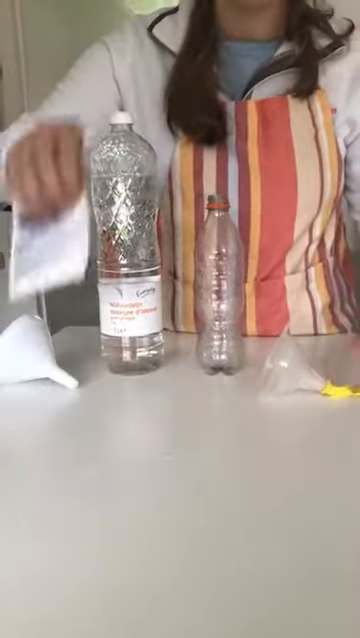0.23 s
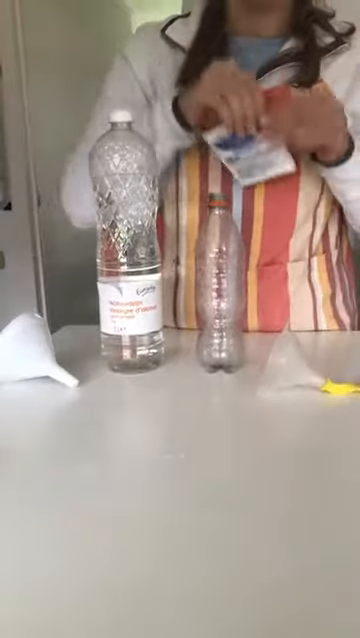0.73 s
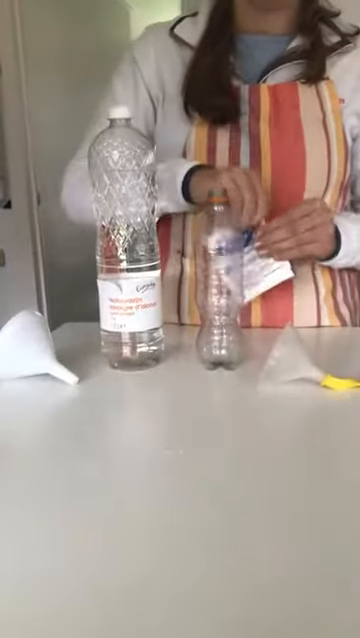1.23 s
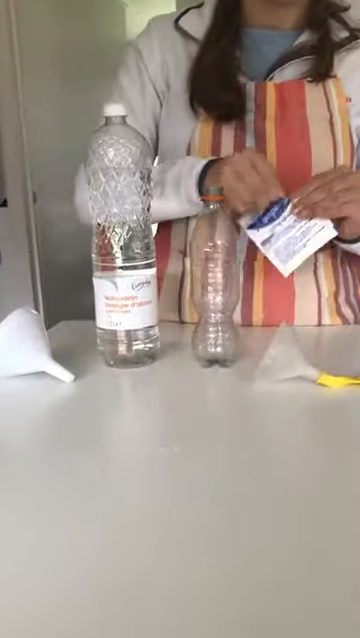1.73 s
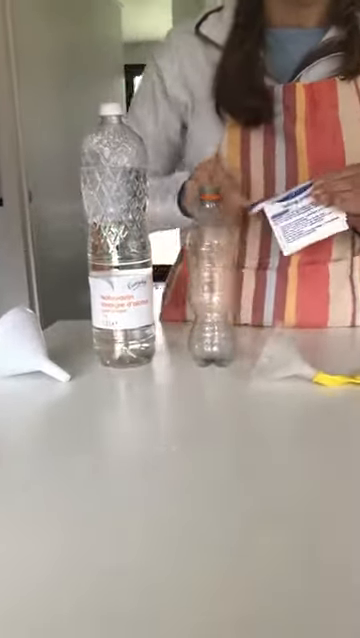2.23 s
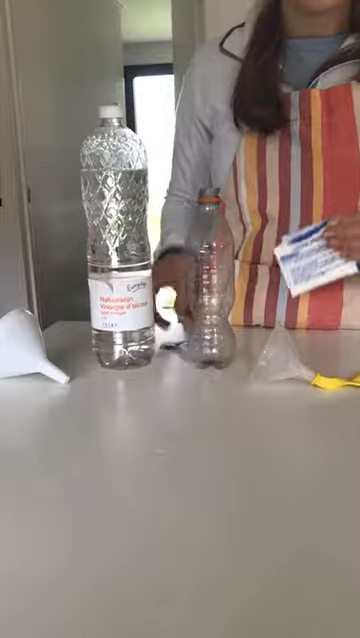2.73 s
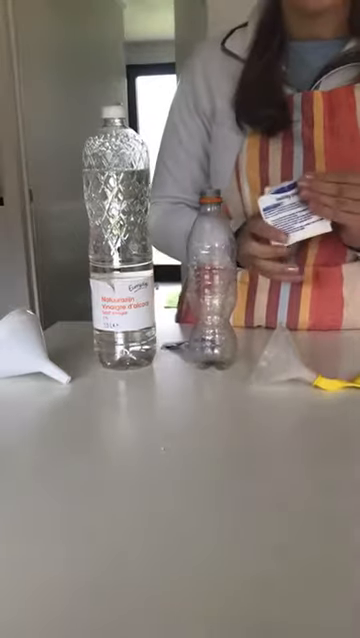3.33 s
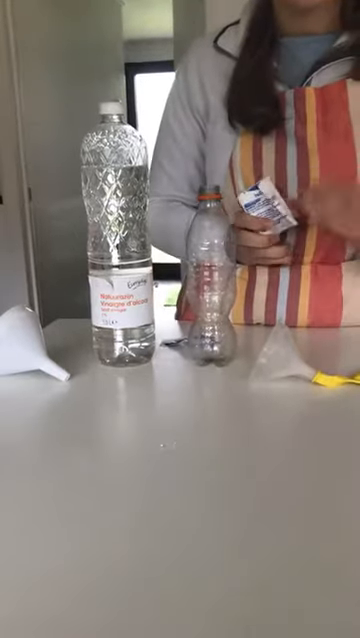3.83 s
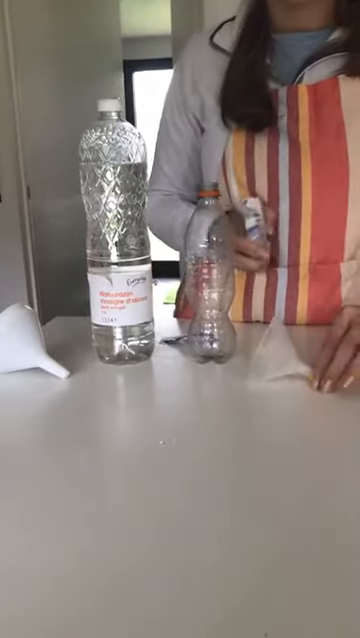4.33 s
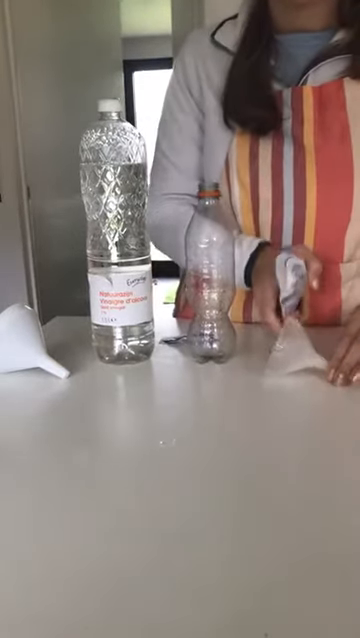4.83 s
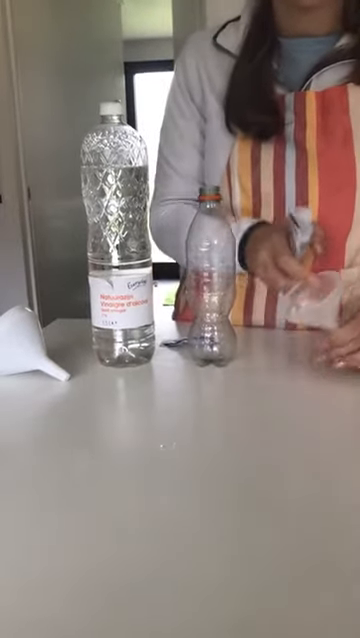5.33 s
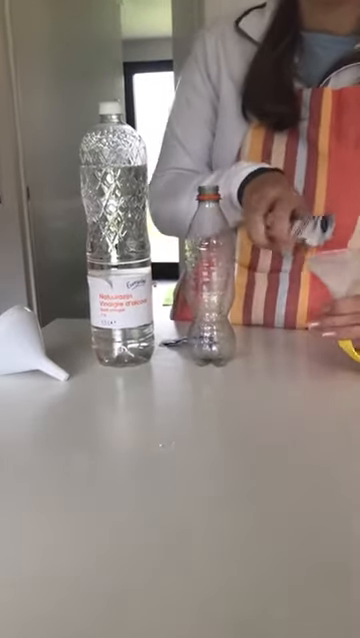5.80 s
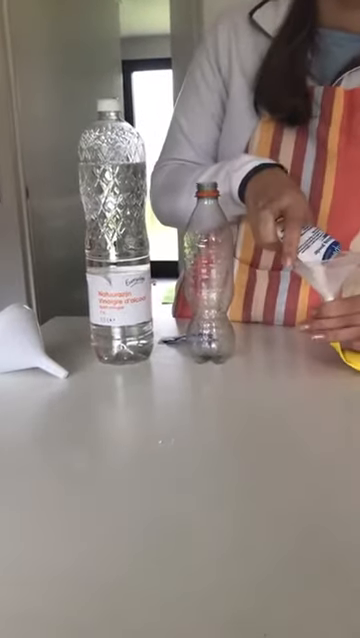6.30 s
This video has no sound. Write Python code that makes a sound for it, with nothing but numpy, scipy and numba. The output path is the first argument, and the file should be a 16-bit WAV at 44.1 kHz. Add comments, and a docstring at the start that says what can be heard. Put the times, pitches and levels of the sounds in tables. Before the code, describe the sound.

Hands handle a small paper sachet with sharp crinkles and snaps, then tear it open in three short, crisp pulls. Lighter rustling and scattered crackles follow as the packet is moved about. From about halfway, a soft, hollow low drone swells and fades unevenly. The sound is fairly close, in a hard-walled kitchen with a slight echo and a faint steady hum.

```python
"""A hard-walled kitchen: above a table, hands crinkle a paper sachet and tear it open in three pulls.
Creases buckle with sharp snaps, fibres break in dense bursts and fingers rustle, all ringing the paper's
resonances and bouncing off the walls. From about halfway a hollow body drones, nudged at random.
Mains hum and room noise lie underneath."""
import sys
import numpy as np
from scipy import signal
from scipy.fft import rfft, irfft
from scipy.io import wavfile
from scipy.ndimage import uniform_filter1d
from numba import njit

SR = 44100
rng = np.random.default_rng(int(sys.argv[2]) if len(sys.argv) > 2 else 0)


def digitize_waveform(pressure):
    """Quantize a signal to 16-bit integers and store it at the path in sys.argv[1].

    Rows of a 2-D input are taken as channels; values are limited to [-1, 1].
    """
    field = np.atleast_2d(pressure).T
    bounded = np.clip(field, -1, 1)
    quanta = np.round(bounded * 32767).astype(np.int16)
    wavfile.write(sys.argv[1], SR, quanta)


N = 289296

# The paper's resonances (boomy panel, crackly crease, crisp edge): pitch_hz, width_hz, gain_db
PANEL_MODES = [(375, 280, 0.5), (500, 67, -7.5), (614, 403, 8.5), (1123, 348, 9)]
CREASE_MODES = [(1960, 1050, -8.5), (2750, 590, 1), (4070, 4100, -5.5), (6000, 980, -3)]
EDGE_MODES = [(8550, 4200, 5.8), (12720, 1900, 5.4), (14300, 1550, 4.4)]


def undb(db):
    """Decibels to amplitude."""
    return 10 ** (np.asarray(db) / 20)


def unit(x):
    """Scale to an rms of 1."""
    return x / np.sqrt(np.mean(x ** 2))


@njit
def bandpass(x, hz, width):
    """State-variable band-pass, gain 1 at the centre."""
    y, band, low = np.empty(len(x)), 0., 0.
    g, damping = np.tan(np.pi * hz / SR), width / hz
    for i in range(len(x)):
        v = (band + g * (x[i] + 1e-18 - low)) / (1 + g * (g + damping))
        band, low, y[i] = 2 * v - band, low + 2 * g * v, damping * v
    return y


def ring(x, modes):
    """A body with a few broad resonances of alternating polarity."""
    return sum((-1) ** k * undb(db) * bandpass(x, float(hz), float(width))
               for k, (hz, width, db) in enumerate(modes))


def fader_curves(spans):
    """One dB curve per column of timed breakpoints; silent outside the spans."""
    t, out = np.arange(N) / SR, np.full((len(spans[0][0]) - 1, N), -150.)
    for span in spans:
        times, *columns = np.transpose(span)
        inside = (t >= times[0]) & (t <= times[-1])
        out[:, inside] = [np.interp(t[inside], times, column) for column in columns]
    return out


def grains(per_s, spread_db):
    """Random clicks; a few are much larger than the rest."""
    hit = rng.random(N) < per_s / SR
    return hit * rng.standard_normal(N) * undb(np.minimum(spread_db * rng.exponential(size=N), 12))


def room_tone(noise_db=-69):
    """Mains hum and the steady noise of room and microphone."""
    # Colour of the noise: frequency_hz, relative_db
    noise_colour = [(15, -57), (25, -16), (60, -2), (97, -4), (321, -3.5), (510, -16.5), (1150, -16),
                    (1550, -18.5), (3510, -23), (7710, -30), (8600, -30.5), (15200, -29), (16500, -66)]
    # Hum partials: pitch_hz, rms_db
    hum_partials = [(49.3, -72.5), (98.6, -79)]
    t, hz = np.arange(N) / SR, np.fft.rfftfreq(N, 1 / SR)
    corner_hz, corner_db = np.transpose(noise_colour)
    colour_db = np.interp(np.log(hz + 1), np.log(corner_hz), corner_db)
    air = unit(irfft(rfft(rng.standard_normal(N)) * undb(colour_db), N))
    hum = sum(np.sqrt(2) * undb(db) * np.sin(2 * np.pi * pitch * t) for pitch, db in hum_partials)
    return undb(noise_db) * air + hum


def kitchen_reverb(x):
    """First reflections from table and walls, and a diffuse tail whose bands die at their own rates."""
    # Bands of the tail: centre_hz, width_hz, t60_s, relative_db
    tail_bands = [(378, 570, 0.51, 1.5), (700, 1500, 0.12, 0.5), (1290, 310, 0.44, 3),
                  (2330, 1400, 0.55, -0.5), (3360, 640, 0.28, 4), (4090, 940, 0.72, -7.5),
                  (6270, 1460, 0.45, 4.5), (9000, 1700, 0.15, 7.5), (12500, 3100, 0.48, -6.5),
                  (15200, 3800, 0.21, 3)]
    # First reflections: delay_s, gain_db
    reflections = [(.0046, -6), (0.0121, -12), (0.026, -35)]
    t = np.arange(int(.7 * SR)) / SR
    rise = np.clip((t - .003) / 0.00069, 0, 1)
    tail = sum(undb(db - 60 * t / t60) * bandpass(rng.standard_normal(len(t)), float(hz), float(width))
               for hz, width, t60, db in tail_bands)
    response = rise * tail / np.sqrt(np.sum(tail ** 2))
    for delay_s, db in reflections:
        response[int(delay_s * SR)] += undb(db)
    return signal.fftconvolve(x, response)[:N]


def drone_swells(attack_s=0.01, hold_s=0.016, t60_s=0.26):
    """An rms envelope: each swell rises fast, holds briefly and dies away."""
    # Swells of the drone: crest_s, peak_db
    swells = [(3.086, -41), (3.321, -68), (3.399, -48.5), (3.438, -44), (3.471, -45), (3.509, -49),
              (3.818, -48.5), (3.909, -52), (3.991, -59), (4.08, -49), (4.11, -50.5), (4.215, -45),
              (4.289, -41.5), (4.329, -55), (4.376, -49.5), (4.593, -50.5), (4.702, -52), (4.774, -49.5),
              (4.833, -52.5), (4.966, -52.5), (5.003, -55), (5.119, -58), (5.184, -50), (5.221, -42),
              (5.274, -51), (5.337, -52), (5.451, -49.5), (5.543, -51), (5.58, -43.5), (5.619, -47),
              (5.693, -46), (5.796, -44.5), (5.845, -47.5), (6.076, -55), (6.152, -59)]
    t, power = np.arange(SR // 2) / SR, np.zeros(N + SR)
    attack = np.clip(t / attack_s, 0, 1)
    decay_db = 60 * np.maximum(t - attack_s - hold_s, 0) / t60_s
    for crest_s, peak_db in swells:
        i = int((crest_s - attack_s) * SR)
        power[i:i + len(t)] += (attack * undb(peak_db - decay_db)) ** 2 / 2
    return np.sqrt(power[:N])


def hollow_drone(evenness=.9):
    """Irregular nudges keep a hollow body sounding, with a faint buzz above its low note."""
    # The body's low resonances and its faint upper ring: pitch_hz, width_hz, gain_db
    hollow_modes = [(212.8, 21.4, 2.5), (177.6, 21, -11.5), (270, 180, -5.5)]
    buzz_modes = [(283, 133, -20.5), (694, 500, -42.5)]
    # The drone between swells: time_s, level_db
    drone_bed = [
        [(3.0, -67), (3.1, -59), (3.55, -58.5), (3.65, -64.5), (3.85, -60), (4.4, -58.5), (5.1, -60),
         (5.8, -57.5), (5.92, -63.5), (6.18, -66), (6.3, -81)],
    ]
    nudges = grains(per_s=600, spread_db=0.81)
    hollow = ring(nudges, hollow_modes)
    level = np.hypot(undb(fader_curves(drone_bed)[0]), drone_swells())
    buzz = uniform_filter1d(level, 16000) * ring(nudges, buzz_modes) / np.std(hollow)
    # steady pushing partly evens out the swings
    swing = np.sqrt(uniform_filter1d(hollow ** 2, 1500))
    evened = hollow / (swing + 0.18 * np.std(hollow)) ** evenness
    # two more passes steepen the flanks of the resonance
    note = unit(bandpass(evened, hz=207., width=40.))
    return bandpass(level * note, hz=218., width=63.) + buzz


def brushes(edge_s=0.006):
    """Grainy friction that starts and stops with the movement."""
    # Short brushes, scrapes and dull bumps: start_s, length_s, centre_hz, nominal_width_hz, level_db
    strokes = [(0.01, 0.028, 9000, 5000, -67), (0.12, 0.038, 5700, 2980, -66), (0.131, 0.05, 955, 700, -62),
               (0.23, 0.064, 12500, 7100, -59), (0.218, 0.034, 850, 500, -57),
               (0.353, 0.059, 8950, 2000, -76), (0.648, 0.013, 310, 120, -55),
               (1.196, 0.11, 9900, 3020, -72), (1.777, .03, 154, 120, -57), (3.468, 0.075, 2820, 2480, -72),
               (3.498, 0.053, 10900, 7000, -73), (3.593, 0.034, 9000, 7000, -69.5),
               (4.136, 0.043, 2800, 2000, -67.5), (4.14, 0.037, 11000, 7000, -72),
               (4.206, 0.084, 93, 30, -67), (4.475, 0.036, 3800, 3000, -68.5), (4.48, .55, 770, 805, -72),
               (4.868, 0.043, 1410, 200, -68), (5.054, 0.047, 9000, 8000, -67.5),
               (5.095, 0.074, 3000, 2850, -65), (5.098, 0.092, 870, 700, -67),
               (5.343, 0.07, 9000, 8000, -74), (6.048, 0.099, 3830, 4030, -73),
               (6.03, 0.25, 1720, 1490, -71.5)]
    out, t = np.zeros(N), np.arange(N) / SR
    friction = unit(grains(per_s=4000, spread_db=2))
    for start_s, length_s, hz, width, db in strokes:
        end_s = start_s + length_s
        span = slice(int(start_s * SR), int(end_s * SR))
        contact = np.clip(np.minimum(t[span] - start_s, end_s - t[span]) / edge_s, 0, 1)
        band = float(hz), 1.3 * width
        out[span] += undb(db) * contact * unit(bandpass(bandpass(friction[span], *band), *band))
    return out


def finger_rustle(boom_db=-6, tick_db=-10):
    """Slipping contact: a fine, soft hail rings the paper, and faint creases tick as they give way."""
    # Fingers and powder brushing the paper: time_s, dull_db, bright_db
    rustle_levels = [
        [(0.0, -69.5, -65.5), (0.15, -71, -80), (0.3, -74.5, -83), (0.8, -84, -77), (0.98, -69, -85.5),
         (1.33, -73, -71), (1.45, -87, -84), (1.9, -70.5, -75), (2.5, -65, -67), (2.72, -71.5, -80),
         (3.09, -68.5, -77), (3.6, -88, -89), (3.83, -67.5, -71), (4.0, -73.5, -77), (4.28, -86, -83),
         (4.45, -72.5, -77), (5.4, -84, -82.5), (6.0, -77, -81.5), (6.15, -68.5, -77), (6.3, -78.5, -78.5),
         (6.56, -78, -68.5)],
    ]
    dull_db, bright_db = fader_curves(rustle_levels)
    hail = grains(per_s=7000, spread_db=2)
    ticks = undb(tick_db) * unit(ring(grains(per_s=40, spread_db=1.9), CREASE_MODES))
    dull = unit(ring(hail, CREASE_MODES)) + undb(boom_db) * unit(ring(hail, PANEL_MODES)) + ticks
    return undb(dull_db) * dull + undb(bright_db) * unit(ring(hail, EDGE_MODES))


def crease_tone(x, hz, q):
    """One crease's own resonance: two band-passes in a row."""
    return bandpass(bandpass(x, float(hz), hz / q), float(hz), hz / q)


def crease_snaps(crack_s=0.00053, thump_s=0.0014, size=1024):
    """Buckling creases shake panel, edge and sheet; returns the direct sound and the reverb send."""
    # Snaps: start_s, peak_db, pitch_hz, then relative to the peak: panel_db, edge_db, sheet_db, send_db
    snaps = [(0.0658, -45.5, 3460, -13, -8, -9, 9), (0.1118, -43, 1550, -17, -18, -19, 13),
             (0.1236, -41.5, 1790, -4, 11, 6, 1.5), (0.1606, -47.5, 1350, -1.5, -14, 5.5, -6),
             (0.2176, -44.5, 3390, 0.5, -1, -11, 4), (0.2296, -33, 3800, -7.5, -14, -23, 0.5),
             (0.4165, -48.5, 3150, -14, -16, -20, -3), (0.5488, -45.5, 1260, -29, -17, -11, 2),
             (0.643, -43.5, 3270, -15, -4.5, -8, 10), (0.6688, -31, 3130, -27, -6, -29, -7),
             (0.7444, -48, 1630, -1.5, -26, -34, 4.5), (0.8008, -39.5, 1980, -20, -20, -6.5, -0.5),
             (0.907, -46.5, 2580, -0.5, -20, -19, 4.5), (0.933, -43, 2500, -10, -10, -11, -6),
             (0.936, -29.5, 2460, -15, -4.5, -7, -3), (0.9522, -28.5, 2460, -10, 2.5, -4, 2.5),
             (1.0703, -50, 2400, -7, -9, -17, 3), (1.098, -37.5, 2070, -6.5, -22.5, -29, -1),
             (1.11, -43, 3460, -11, -6, -19, -11), (1.1226, -32.5, 2110, -11.5, -7.5, -9, -0.5),
             (1.2455, -56, 1800, 0.5, 1.5, -5, 7), (1.282, -26, 2540, -13.5, -10, -47, 0.5),
             (1.3068, -42, 2000, 2, -9, -2, 1), (1.4291, -43, 1390, -3, -24, -17, 2.5),
             (1.497, -29.5, 3770, -15.5, -1.5, -5.5, -0.5), (1.7391, -50.5, 2720, -1, -9, -22, 6.5),
             (1.7779, -31.5, 2930, -2, 8.5, -26, -36), (1.823, -25, 2660, -8.5, 2.5, -32, 2.5),
             (1.8268, -20, 2880, -10.5, -3, -16, -21), (1.83, -27.5, 2370, -1.5, 8, -13, -15),
             (1.9133, -32.5, 2870, -17, -5, -16, 2), (1.9778, -30, 2700, -8, 9, -24, -1),
             (2.0197, -41, 5000, -13, 5.5, -3, 8), (2.0317, -48, 5900, -11, -2, -11, 12),
             (2.049, -50.5, 4040, 5.5, 6, -12, -6), (2.0653, -47, 4690, -6, 10, -13, -11),
             (2.0725, -42.5, 4030, -10, 12, -3, 1), (2.0988, -41, 5900, -21, 6, -16, 2),
             (2.128, -42, 5940, -16, -2, -10, 8), (2.1534, -32, 2820, -12, -10, -31, 5),
             (2.3687, -31.5, 2660, -9.5, -10, -4.5, 8), (2.411, -29, 4000, -20, 7, -10, -3),
             (2.4468, -35, 3710, 1, -3, -18, -3), (2.555, -42.5, 2823, -8, -11, -20, 4),
             (2.7225, -24, 2760, -25.5, 1.5, -2, 6), (2.7528, -35.5, 3240, -10.5, -30, -31, 11),
             (3.0079, -54.5, 1340, 9.5, -5, -8, 7.5), (3.1132, -43.5, 6000, -9, -2, -11, 4),
             (3.1319, -44.5, 2400, -5, -13, -1, 11.5), (3.141, -26.5, 3660, -20, 8, -12, -4.5),
             (3.2556, -44.5, 2650, -8, -25, -11, 4), (3.3728, -57, 2610, 0.5, 0, -14, 7),
             (3.4232, -52.5, 3120, 1.5, -27, -25, -14), (3.45, -56, 3000, 1, -18, -21, 0),
             (3.466, -43, 2400, -6.5, -20, -29, 5), (3.6233, -44.5, 3340, 1.5, -11, -6, 2.5),
             (3.6479, -46.5, 2330, -6, -17, -33, 1), (3.7273, -55, 3070, -3, 1, -10, 4),
             (3.7574, -35, 3170, -7.5, -3, 0, -11), (3.7627, -20, 3160, -20.5, -3.5, -36, 0),
             (3.7888, -48.5, 2840, -7, 7.5, -11, 14), (3.8248, -40.5, 2190, -7.5, -9, -18, -1),
             (3.9444, -59, 3100, 2, -17, -7, 2), (4.149, -52.5, 2620, -2, 7, -30, -4),
             (4.1614, -47.5, 2300, -9, -25, -33, 7), (4.246, -54, 2500, -11, -26, -29, -11),
             (4.3323, -65, 1360, 5, -15, -16, -3), (5.0818, -39.5, 1320, -6.5, -10, -7.5, 7),
             (5.5802, -55, 2880, -12, -6, -13, -2), (5.8364, -54.5, 3540, -7, -11, -19, -12),
             (6.1244, -51.5, 2900, -14, -1, -7, 12.5), (6.1431, -33.5, 3660, -16, -13, -4.5, -1.5),
             (6.4755, -49, 1230, -10, -17, -13, 10.5)]
    # Ring of the taut sheet: pitch_hz, width_hz, gain_db
    sheet_modes = [(4080, 590, 6), (4690, 1100, 5)]
    direct, send, t = np.zeros(N + size), np.zeros(N + size), np.arange(size) / SR
    crack = t / crack_s * np.exp(-t / crack_s)
    thump = t / thump_s * np.exp(-t / thump_s)
    click = 1. * (t == 0)
    buckle = np.roll(click, 20)  # lands near the crest of the crack
    for start_s, peak_db, hz, panel_db, edge_db, sheet_db, send_db in snaps:
        noise = rng.standard_normal((4, size))
        aimed = [crease_tone(crack * noise[0] + 0.7 * buckle, hz, q=1.75),
                 ring(thump * noise[1], PANEL_MODES),
                 ring(crack * noise[2] + 0.34 * buckle, EDGE_MODES),
                 ring(crack * noise[3], sheet_modes)]
        # the walls hear all directions at once, so the fine ripples of one direction average out
        diffuse = [crease_tone(click, hz, q=0.64)]
        diffuse += [ring(click, modes) for modes in (PANEL_MODES, EDGE_MODES, sheet_modes)]
        i = int(start_s * SR)
        for part, smooth, part_db in zip(aimed, diffuse, (0, panel_db, edge_db, sheet_db)):
            part = undb(peak_db + part_db) * part / np.max(np.abs(part))
            direct[i:i + size] += part
            send[i:i + size] += undb(send_db) * np.std(part) * smooth / np.std(smooth)
    return direct[:N], send[:N]


def tearing(fine_per_s=3000, coarse_per_s=700, spread_db=3, shared_gain=0.64):
    """Breaking fibres: a hail of clicks, partly shared by the resonances; the panel feels coarser ones."""
    # Three pulls, with a slow creep leading into the second:
    # grip_s, hardest_s, release_s, grip_db, hardest_db, release_db, relative_boom_db, relative_edge_db
    pulls = [(1.777, 1.812, 1.88, -50, -35, -49.5, -5, 3), (1.956, 1.995, 2.3, -54, -54, -55, -9, -9),
             (2.122, 2.221, 2.287, -58, -41, -49, -5, 3), (2.36, 2.423, 2.4646, -53.5, -40, -52.5, -5, 4)]
    spans = [[(s, db, boom, edge) for s, db in zip(pull[:3], pull[3:])] for *pull, boom, edge in pulls]
    level_db, boom_db, edge_db = fader_curves(spans)
    shared = shared_gain * unit(grains(fine_per_s, spread_db))

    def breaks(modes, per_s):
        return unit(ring(shared + unit(grains(per_s, spread_db)), modes))

    rip = breaks(CREASE_MODES, fine_per_s)
    boom = undb(boom_db) * breaks(PANEL_MODES, coarse_per_s)
    crisp = undb(edge_db) * breaks(EDGE_MODES, fine_per_s)
    return undb(level_db) * (rip + boom + crisp)


def scene(reverb_db=-8):
    """The paper and its reverb over the drone and the room tone, in mono."""
    snaps, snap_send = crease_snaps()
    fibres = tearing() + finger_rustle()
    scrapes = brushes()
    reverb = undb(reverb_db) * kitchen_reverb(snap_send + fibres + scrapes)
    low_cut = signal.butter(3, 230, "high", fs=SR, output="sos")  # so small a sheet radiates no bass
    paper = signal.sosfilt(low_cut, snaps + fibres + reverb)
    return (paper + scrapes + hollow_drone() + room_tone())[None]


def record(dry):
    """The microphone port dips near ten kilohertz; the phone cuts the top."""
    dipped = dry - 0.4 * bandpass(dry[0], hz=10500., width=560.)
    high_cut = signal.ellip(10, .2, 60, 15900, fs=SR, output="sos")
    return signal.sosfilt(high_cut, dipped)


dry = scene()
out = record(dry)
digitize_waveform(out)
```